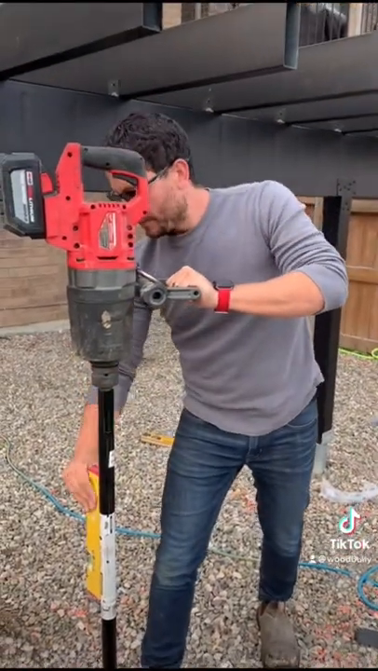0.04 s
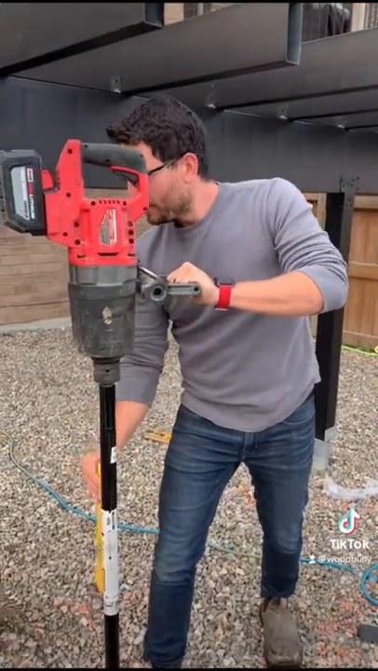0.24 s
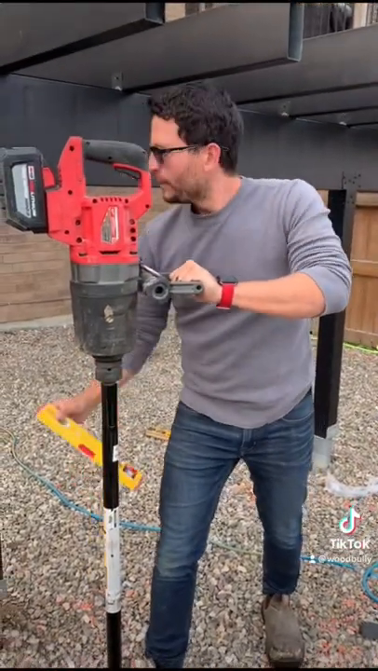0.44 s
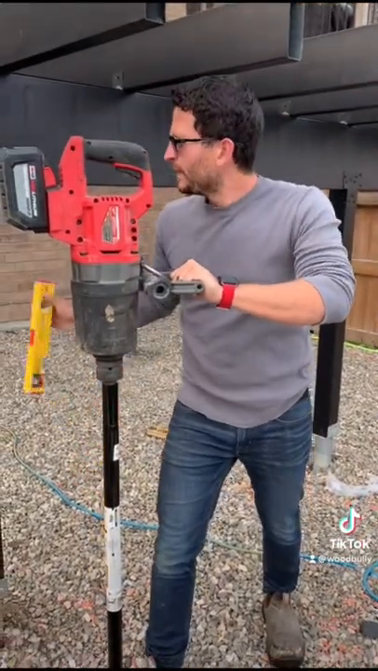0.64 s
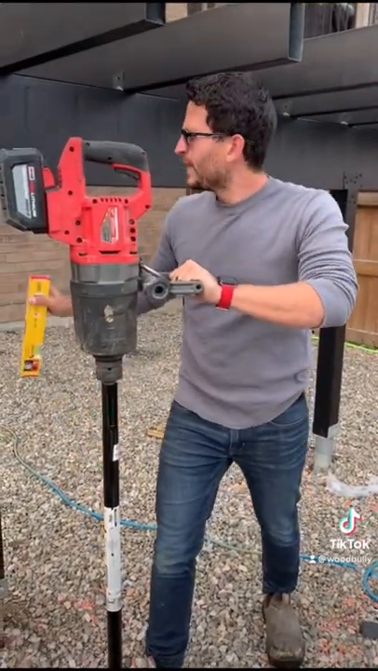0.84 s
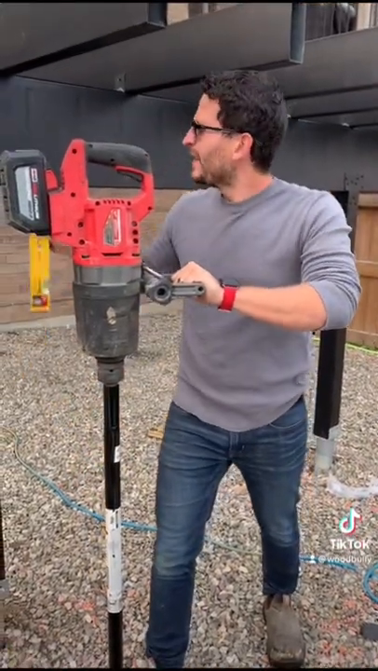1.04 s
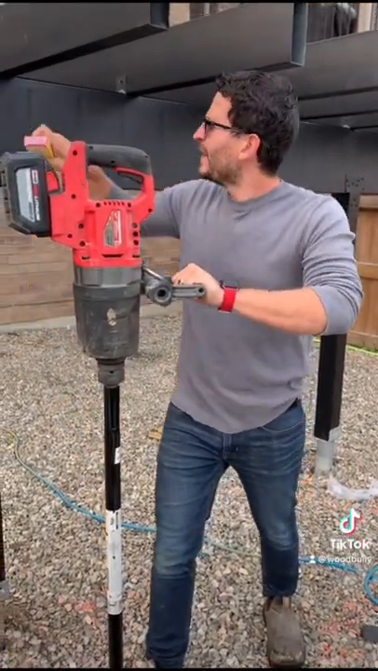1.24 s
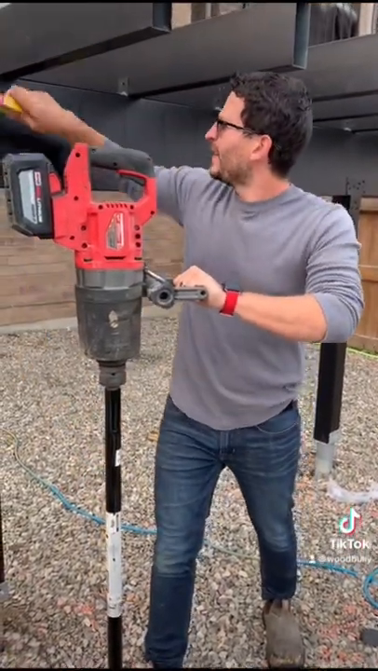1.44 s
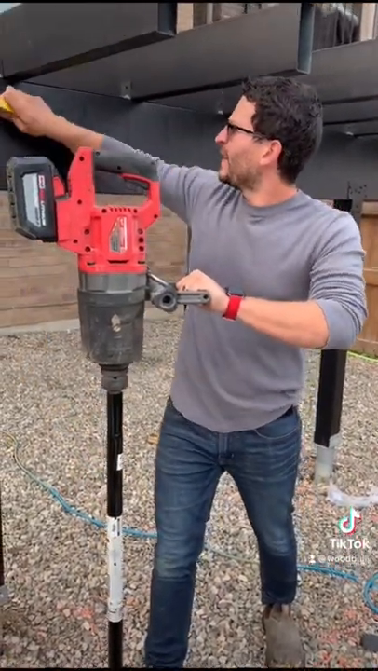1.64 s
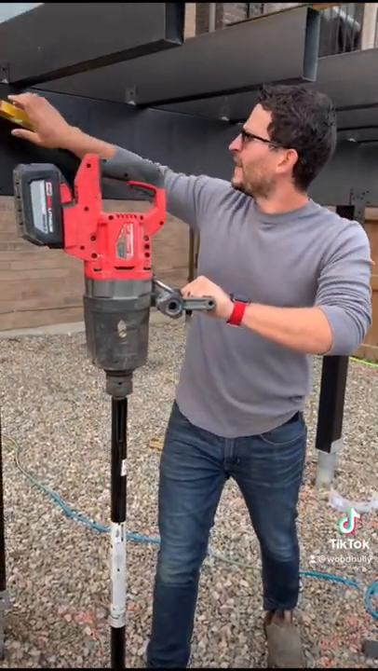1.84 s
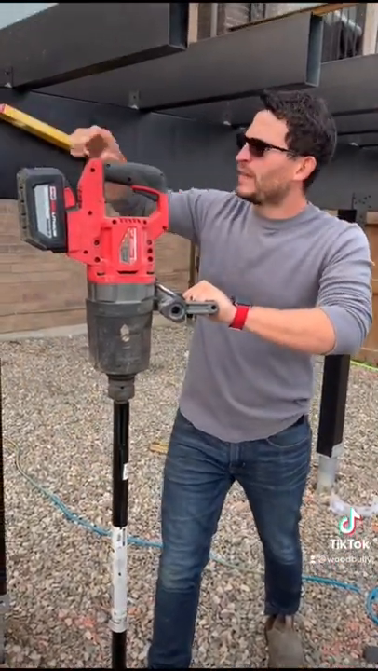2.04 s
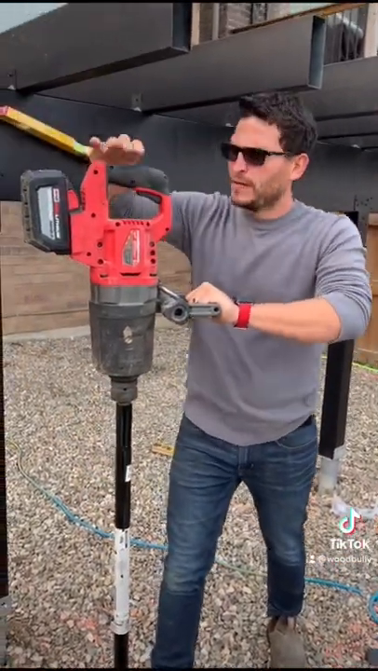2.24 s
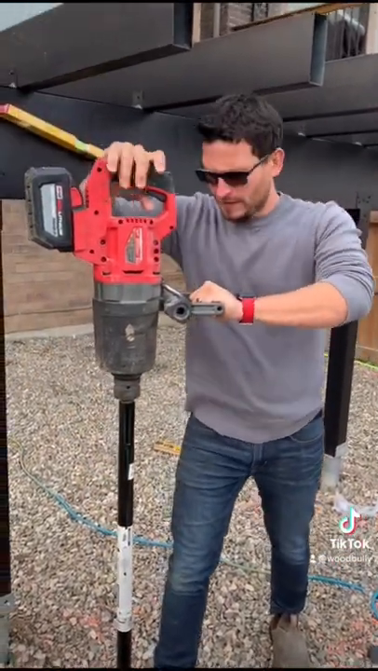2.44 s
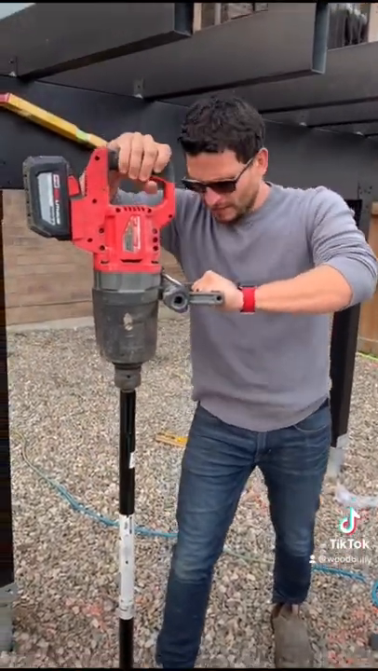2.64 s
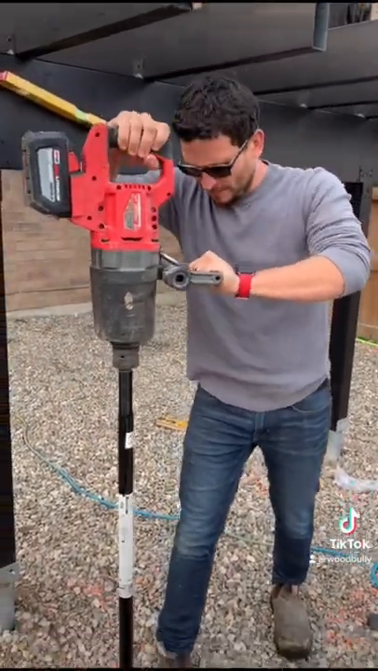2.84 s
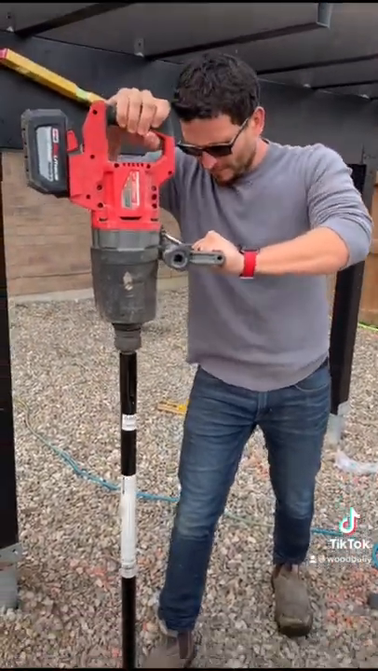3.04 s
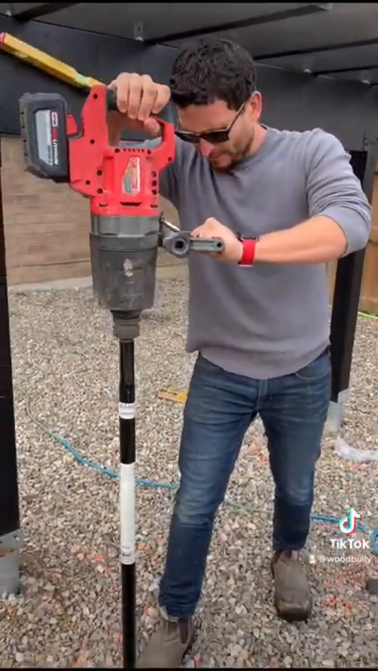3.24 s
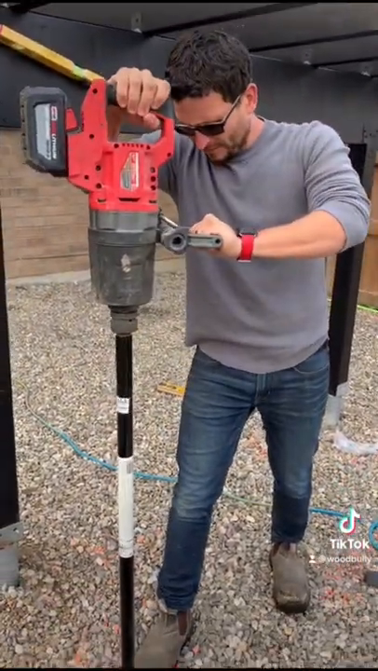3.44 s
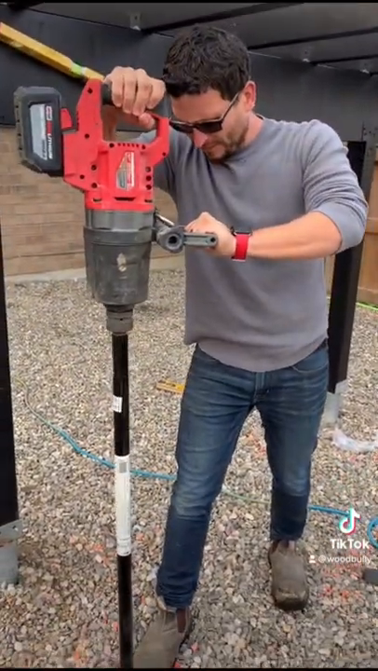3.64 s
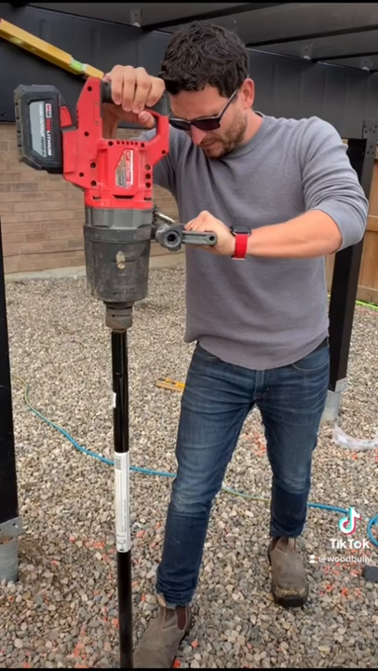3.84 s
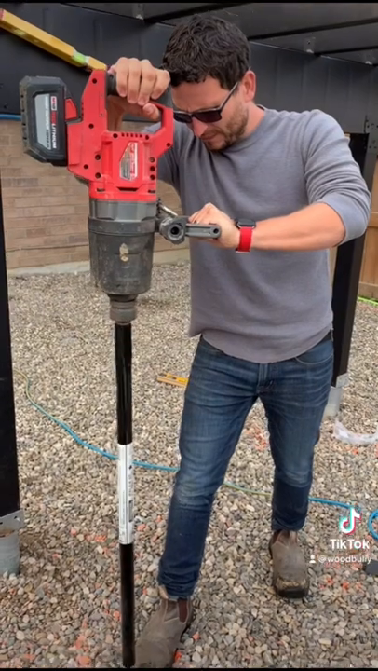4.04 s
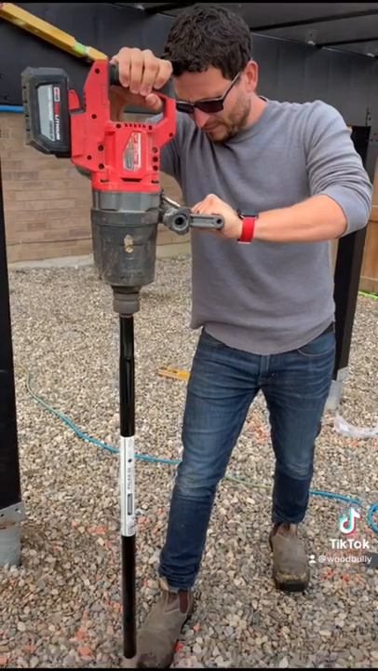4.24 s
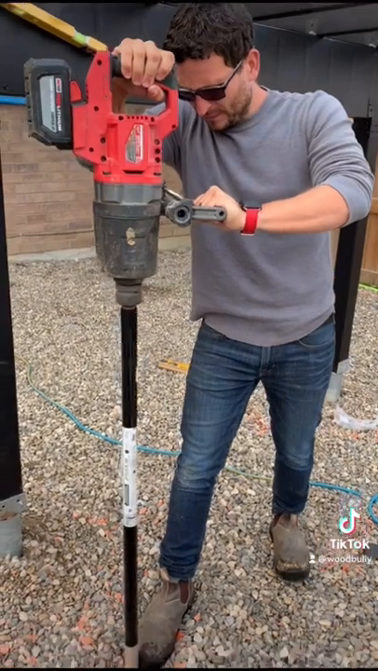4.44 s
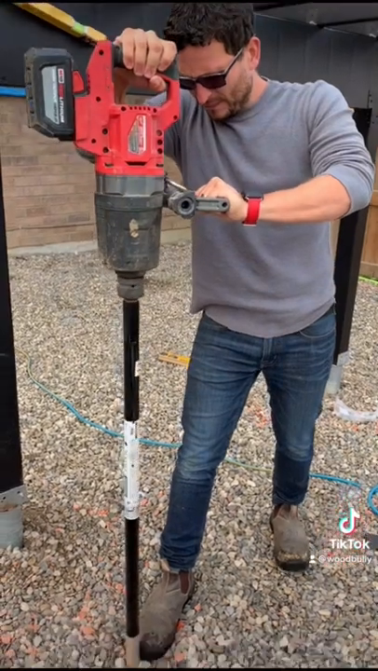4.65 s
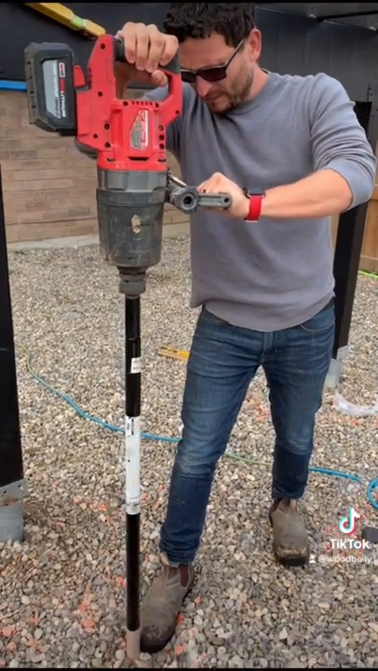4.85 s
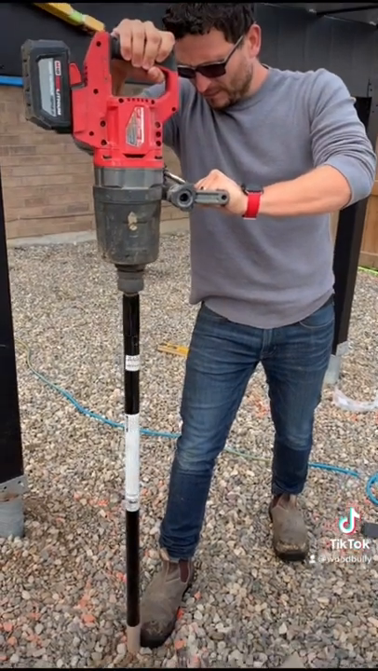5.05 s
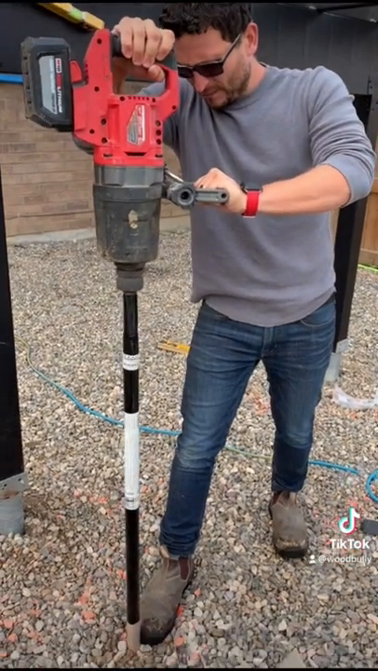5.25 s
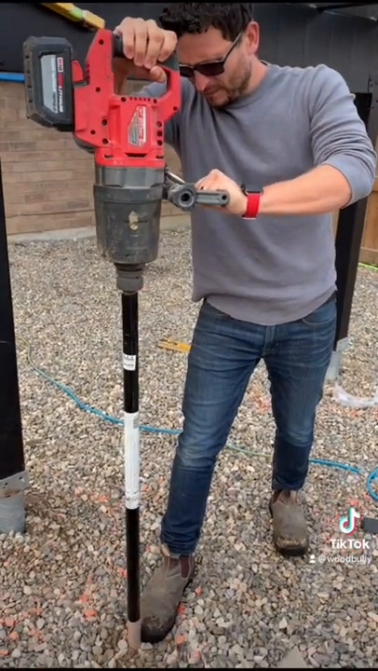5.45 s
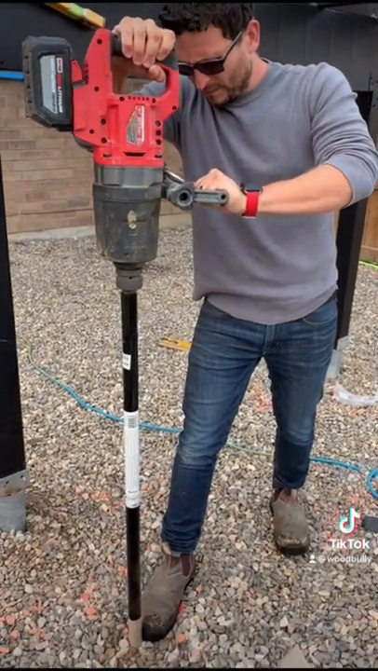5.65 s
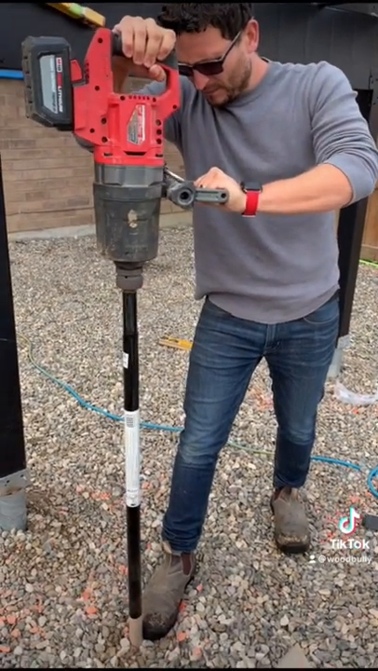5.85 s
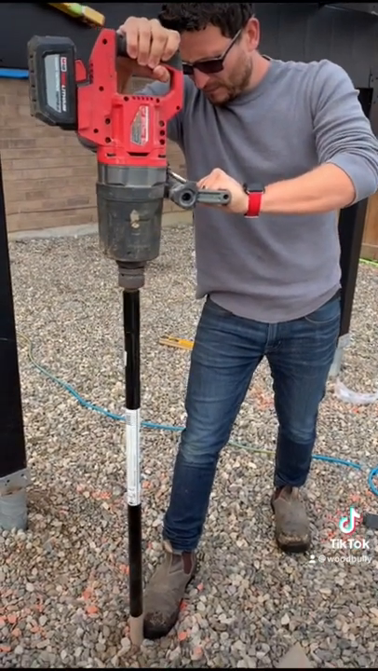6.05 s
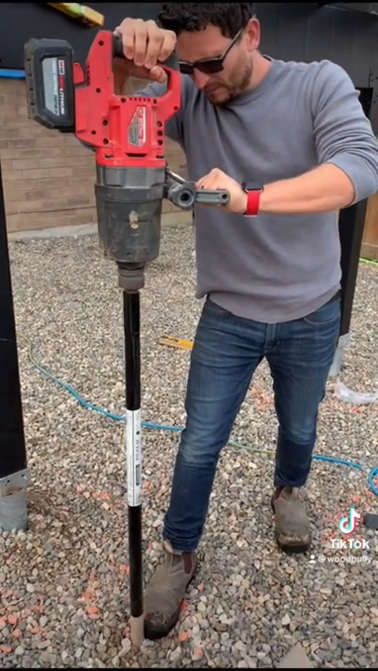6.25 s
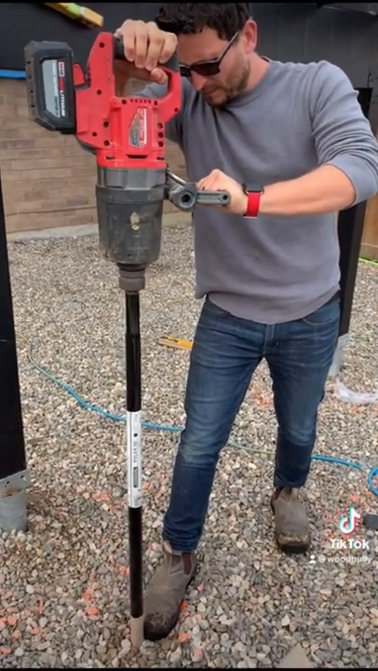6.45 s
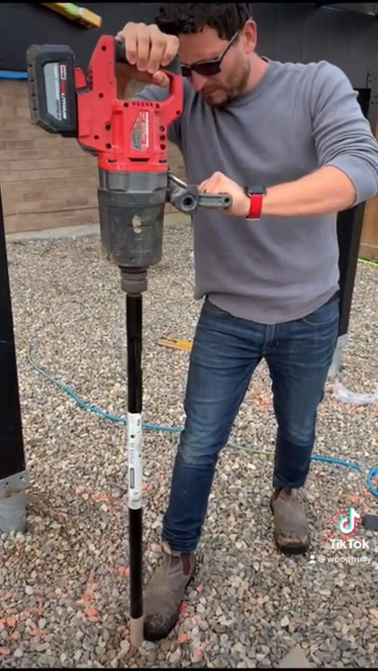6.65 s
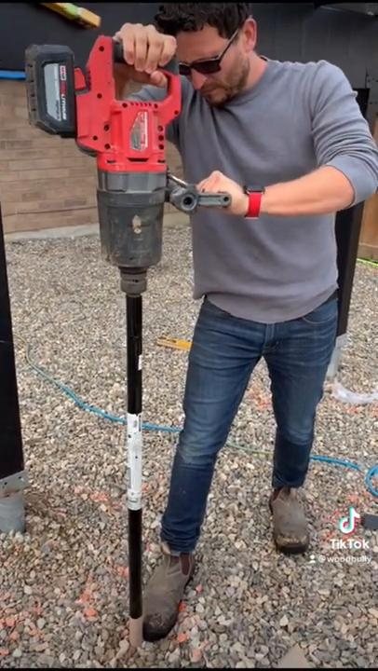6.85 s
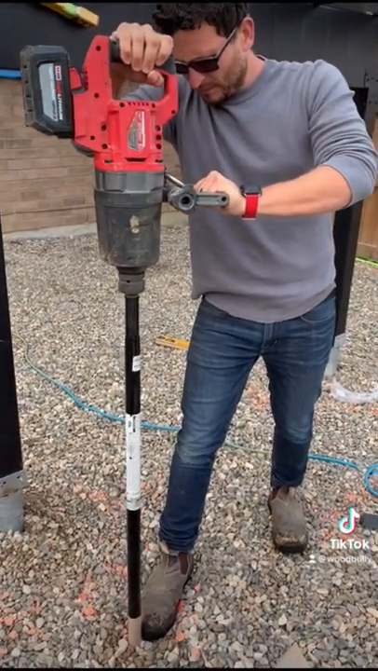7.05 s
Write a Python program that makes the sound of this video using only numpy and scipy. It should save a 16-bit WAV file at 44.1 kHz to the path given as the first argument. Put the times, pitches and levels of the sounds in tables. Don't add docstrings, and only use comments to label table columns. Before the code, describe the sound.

Outdoors in a gravel yard under a steel deck, faint traffic rumble and air with tiny gritty ticks. A level is laid on a steel beam: a sharp bending clang with a long beating ring. Then a motor rattles and whirs up, and rapid, loud, clattering steel blows drive a pile without pause, each with hard rebounds. Close phone microphone, wide stereo, short metallic echoes.

```python
import sys
import numpy as np
from scipy import signal
from scipy.fft import rfft, irfft, next_fast_len
from scipy.io import wavfile
from scipy.ndimage import uniform_filter1d, minimum_filter1d

SR = 44100
rng = np.random.default_rng(int(sys.argv[2]) if len(sys.argv) > 2 else 0)


def output_pcm(signal):
    pcm = np.clip(np.atleast_2d(signal).T, -1, 1) * 32767
    wavfile.write(sys.argv[1], SR, np.round(pcm).astype(np.int16))


def invert_db(x):
    u = np.asarray(x, float) / 20
    return 10 ** u


N = 313282
TIME_S = np.arange(N) / SR


def evened(x):
    return x / np.sqrt(np.mean(x ** 2) + 1e-20)


def read(points, hz, col=1):
    return np.interp(np.log(hz + 1), np.log([p[0] + 1 for p in points]), [p[col] for p in points])


def curve(rows, col):
    return np.interp(TIME_S, [r[0] for r in rows], [r[col] for r in rows])


def add(mix, s, sound):
    part = mix[round(s * SR):][:len(sound)]
    part += sound[:len(part)]


def resonate(x, hz, width_hz):
    r = np.exp(-np.pi * width_hz / SR)
    return signal.lfilter([1 - r, 0, r - 1], [1, -2 * r * np.cos(2 * np.pi * hz / SR), r * r], x)


def bands(centres_hz, size):
    padded = next_fast_len(size)
    log_hz = np.log(np.fft.rfftfreq(padded, 1 / SR) + 1)
    z = rfft(rng.standard_normal(size), padded)
    at = np.log(np.r_[centres_hz[0] * .6, centres_hz, centres_hz[-1] * 1.08])
    return [irfft(z * np.interp(log_hz, at, w), padded)[:size] for w in np.eye(len(at))[1:-1]]


def coloured(points, size):
    padded = next_fast_len(size)
    gain = invert_db(read(points, np.fft.rfftfreq(padded, 1 / SR)))
    return evened(irfft(rfft(rng.standard_normal(size), padded) * gain)[:size])


# time in seconds, level in dB.
RUMBLE_LEVEL = [
    (0.0, -47.5),
    (0.92, -47),
    (1.28, -43.5),
    (1.48, -43.5),
]
# frequency in Hz, density in dB per Hz.
RUMBLE = [(15, -61.5), (25, -37), (43, -18), (62, -3), (81, -10), (97, -7), (161, -8.5), (249, -36),
          (305, -28), (600, -50.5), (780, -84.5), (1320, -120)]
# frequency in Hz, density in dB per Hz.
AIR = [(250, 5.5), (600, -2.5), (1500, -5), (2200, -17), (2900, -12.5), (3600, -20), (4700, -17),
       (5500, -18.5), (6600, -19.5), (7500, -29.5), (9000, -32.5), (15000, -27.5)]
# frequency in Hz, likeness 0 to 1.
AIR_LIKENESS = [(100, 0.99), (300, 0.66), (650, 0.13), (1400, 0.16), (2600, .6), (4500, 0.76), (15000, 1)]


def yard(air_db=-62.5, gust_db=6.5, gust_s=.12, waver_db=1.5):
    size = next_fast_len(N)
    air = invert_db(air_db + gust_db * np.exp(-TIME_S / gust_s))
    air = air * invert_db(waver_db * evened(uniform_filter1d(rng.standard_normal(N), size=3000)))
    same = np.clip(read(AIR_LIKENESS, np.fft.rfftfreq(size, 1 / SR)), 0, 1)
    rumble = invert_db(curve(RUMBLE_LEVEL, 1))
    a, b = (rumble * coloured(RUMBLE, N) + air * coloured(AIR, N) for _ in "ab")
    right = irfft(same * rfft(a, size) + np.sqrt(1 - same ** 2) * rfft(b, size), size)[:N]
    return np.array([a, right])


# start in seconds, peak in dB,
# centre in Hz, t60 in seconds, treble in dB.
TICKS = [(0.3344, -51, 2790, 0.025, -8), (0.4886, -33.5, 3400, 0.023, -8), (0.5107, -48, 2300, 0.03, -7),
         (0.7137, -39.5, 6000, 0.031, -12), (0.7267, -41, 5540, 0.033, -19), (0.745, -52, 3500, 0.066, -14),
         (1.2144, -77, 2660, 0.027, -29), (2.2894, -47.5, 2340, 0.028, -33),
         (2.4064, -55, 2440, 0.025, -28), (2.481, -48, 2800, 0.04, -33), (2.4887, -39.5, 2300, 0.033, -43),
         (2.659, -48, 5500, 0.03, -19), (2.7082, -23, 2050, 0.052, -44)]


def ticks():
    t, out = np.arange(3000) / SR, np.zeros(N)
    for s, db, hz, t60_s, treble_db in TICKS:
        spectrum = [(hz / 5, -20), (hz / 1.4, -4), (hz, 0), (9000, treble_db + 1), (16000, treble_db - 18)]
        burst = coloured(spectrum, len(t))
        shape = invert_db(db - 8.5 - 60 * t / max(t60_s, .005)) * np.minimum(t / 0.00028, 1)
        add(out, s, shape * burst)
    return out


# frequency in Hz, level in dB, t60 in seconds.
BEAM = [(169.7, -4.5, 2.3), (310, -17.5, 3), (467, -11, 1.2), (581, -11, 3.6), (724, -28, 1.4),
        (826, -21, 1.2), (846, -13.5, 4.3), (970, -12.5, 2.2), (1180, -16.5, 0.78), (1650, -14.5, 2.86)]
# centre in Hz, early dB, early t60 in seconds, late dB, late t60 in seconds.
FRAME = [(75, -51, 0.64, -50, 15), (170, -38, 1, -35, 5.9), (277, -56, 0.48, -37, 5.3),
         (479, -44.5, 0.27, -30, 3.7), (660, -26, 0.39, -40, 3.2), (968, -34.5, 0.28, -34.5, 2.53),
         (1560, -15.5, 0.12, -36, 1.8), (2950, -22.5, 0.37, -56, 3.45), (5500, -22.5, 0.21, -48.5, 0.75),
         (10300, -18, 0.064, -46, 0.3), (14500, -47.5, 0.083, -51, .3)]


def clang(start_s=1.5285, sweep_db=-6, modes_db=-23.5, top_hz=2700, low_hz=119, glide_ms=1.1):
    t, out = np.arange(60000) / SR, np.zeros(N)
    hz = low_hz + top_hz / (1 + (t * 1e3 / glide_ms) ** 1.9)
    sweep = invert_db(sweep_db) * np.sin(2 * np.pi * np.cumsum(hz) / SR) / (1 + (t / .0155) ** 10)
    twins = rng.uniform(-9.5, 9.35, (len(BEAM), 3, 1))
    modes = 0
    for (f, db, t60_s), p in zip(BEAM, twins):
        tones = np.sin(2 * np.pi * (f + p * min(f / 600, 1)) * t + p).sum(0)
        modes = modes + invert_db(modes_db + db - 60 * t / min(t60_s, 1.7)) * tones
    frame = 0
    for noise, row in zip(bands([r[0] for r in FRAME], len(t)), FRAME):
        _, early_db, early_s, late_db, late_s = row
        fall = invert_db(early_db - 60 * t / early_s) + invert_db(late_db - 60 * t / late_s)
        frame = frame + evened(noise) * fall
    add(out, start_s, sweep + (modes + frame) * np.minimum(t / 0.00071, 1))
    slide = np.arange(600)
    add(out, start_s - 600 / SR, invert_db(-16 - 38 * (1 - slide / 600)) * coloured(HISS, 600))
    return out


# frequency in Hz, level in dB, t60 in ms, delay after the rebound in ms.
THUMP = [(63.9, -32, 200, -18.5), (81.4, -36.5, 176, 12), (104, -37, 263, 11.5), (163.7, -30.5, 94, 8),
         (213.4, -37, 214, 8), (259.5, -37.5, 93, 25.5), (115, -16, 15, -8)]


def thump(first_db=6, settle_s=0.31, take_up_s=2.772):
    t, out = np.arange(9000) / SR, np.zeros(N)
    rebounds = np.array(TURNS)[:, 0] + 0.0156
    for hz, db, t60_ms, after_ms in THUMP:
        push = invert_db(db - 60e3 * t / t60_ms) * np.sin(2 * np.pi * hz * t) * np.minimum(t * hz * 2, 1)
        for s in np.r_[take_up_s, rebounds]:
            add(out, s + after_ms / 1e3, invert_db(first_db * np.exp((rebounds[0] - s) / settle_s)) * push)
    return out


# frequency in Hz, width in Hz, level in dB.
GEARS = [(674, 224, -4.5), (1446, 110, -1.5), (1860, 480, 1), (2252, 320, -1.5), (3110, 240, -10)]
# frequency in Hz, width in Hz, level in dB.
WHINE = [(7090, 44, 2), (7720, 35, -2.5), (8310, 32, 2)]
# frequency in Hz, level in dB.
HISS = [(300, -23), (1000, 4), (3500, -5.5), (6000, -10.5), (9000, -13.5), (12000, -26), (15000, -35.5)]
# time in seconds, level in dB.
DRIVE = [
    (2.697, -53),
    (2.703, -43),
    (2.72, -26),
    (2.727, -32),
    (2.755, -24),
    (2.788, -22),
    (2.84, -33),
    (3.3, -33.5),
    (3.45, -36),
]
# time in seconds, tilt in dB per octave.
TILT = [
    (2.73, 4),
    (2.762, -10),
    (2.785, -5.5),
    (2.792, 11),
    (2.84, -0.5),
]
# time in seconds, level in dB.
SLACK = [(2.7263, 9), (2.7317, 10), (2.74, 8), (2.7462, 8), (2.7503, 9), (2.7548, 10), (2.762, -1),
         (2.7658, 1), (2.77, 5), (2.7738, 8), (2.7785, 1), (2.7835, 2)]


def motor(teeth_per_s=900, lumpy_db=1.5, start_hz=8100, whine_db=-47.5, whine_rise_s=.02, spin_s=.085,
          fan_db=-29.5, fan_power=2.7, fan_load_db=-9, load_s=0.74):
    white = rng.standard_normal(N)
    loaded = np.clip((TIME_S - TURNS[0][0] + 0.03) * 40, 0, 1)

    teeth = (rng.random(N) < teeth_per_s / SR) * rng.standard_normal(N)
    slack, (at_s, db) = np.zeros(N), np.transpose(SLACK)
    slack[(at_s * SR).astype(int)] = invert_db(db)
    teeth = (0.4 + .7 * loaded) * teeth * invert_db(lumpy_db * rng.standard_normal(N)) + slack
    teeth = signal.oaconvolve(teeth, np.hanning(15), "same")
    tilt = curve(TILT, 1)
    gears = []
    for hz, width_hz, db in GEARS:
        mode = evened(resonate(resonate(teeth, hz, width_hz), hz, 2 * width_hz))
        gears.append(invert_db(db + tilt * np.log2(hz / 1800)) * mode)
    rattle = (loaded * gears[0] + sum(gears[1:])) / 1.74

    running = sum(invert_db(db) * evened(resonate(white, hz, width_hz)) for hz, width_hz, db in WHINE)
    starting = evened(resonate(resonate(white, start_hz, 160), start_hz, 400))
    whine = loaded * running + (1 - loaded) * starting

    since_s = np.maximum(TIME_S - DRIVE[0][0], 0)
    speed = np.minimum(since_s / spin_s, 1)
    fan = invert_db(fan_db + fan_load_db * np.minimum(since_s / load_s, 1)) * speed ** fan_power * coloured(HISS, N)
    rattle = (since_s > 0) * invert_db(curve(DRIVE, 1)) * rattle
    return rattle + invert_db(whine_db) * np.minimum(since_s / whine_rise_s, 1) * whine + fan


# frequency in Hz, level in dB.
CATCH = [(700, -26), (1090, -30), (1850, -38)]


def catch(after_ms=63, length_ms=5.5, uneven_db=0.0, loose_ms=0.58):
    t, out = np.arange(0, length_ms / 1e3, 1 / SR), np.zeros(N)
    for (s, *_), luck in zip(TURNS, rng.standard_normal((len(TURNS), 1 + len(CATCH)))):
        tap = 0
        for (hz, db), u in zip(CATCH, luck[1:]):
            tap = tap + invert_db(db + uneven_db * u) * np.sin(2 * np.pi * hz * (1 + 0.018 * u) * t)
        add(out, s + (after_ms + loose_ms * luck[0]) / 1e3, tap * np.hanning(len(t)))
    return out


# strike time in seconds, strike and rebound in dB over the steady blow.
TURNS = [(2.7912, 8, -1.5), (2.8656, 3.5, 1), (2.9428, 4.5, 2.5), (3.0211, 3, 1.0), (3.0989, 1.5, 3.5),
         (3.1757, 4, 1.5), (3.2531, 5.5, 0), (3.329, 1, -0.5), (3.406, 0, -2), (3.4816, 0.5, 1),
         (3.5599, -1.5, -2), (3.6364, 0.5, -2.5), (3.7141, 0, -4), (3.7893, -2.5, 0.5), (3.866, -1, -5.5),
         (3.9422, 1, -3), (4.0175, -0.5, -3.5), (4.094, -1.5, -1), (4.1709, 0.5, -0.5), (4.2472, 0, -3),
         (4.3242, 0, -3), (4.401, -1.5, 0.5), (4.4791, -0.0, -0.5), (4.5558, 0, -2), (4.6335, 0.5, -0.5),
         (4.7113, -1.0, -1.5), (4.7873, 1, -3.5), (4.8628, -0.5, -3), (4.9377, -1.5, -1),
         (5.0142, -0.5, 0.5), (5.0908, -1.5, -3), (5.168, 1.5, -0.5), (5.2441, 0.5, -2.5),
         (5.3199, -0.5, 0), (5.3975, -2, -2), (5.4736, 0, 1.0), (5.5503, 0.5, -4), (5.6255, 0.5, 0),
         (5.7011, 0, -0.5), (5.7756, -0.0, -1), (5.851, 0, -2), (5.9268, -0.0, 0), (6, 0, -1),
         (6.0753, 1, -2), (6.1515, 0, -3), (6.2265, -0.5, -2), (6.3024, 2, -2.5), (6.377, 1.5, -2.5),
         (6.4529, 1, -1.0), (6.5279, 0.5, -2), (6.6039, 0, -0.5), (6.6797, -1, -2.5), (6.7561, 0.5, -0.5),
         (6.8326, -1.0, -3), (6.909, -0.0, 0.5), (6.9845, -1, -1.5), (7.0613, 1.0, -3)]
# delay after the strike in ms, level in dB over the steady blow.
KNOCKS = [(34.0, 2.5), (34.0, -4), (33.4, 3.75), (36.2, 0), (37.6, 5.5), (33.9, 8), (34.3, -35), (35.3, -8),
          (36.6, -2), (35.7, 0.5), (35, 4), (36.6, 1.5), (34.6, 3.5), (35.4, -2), (34.9, 5), (35.5, 0),
          (34.6, 1.5), (34.6, 4), (35.1, -2), (35.3, 6), (37.8, 7.5), (36.5, -3), (33.4, 3.5), (35.4, 3),
          (35.8, 1), (35.4, 0), (35.3, 3), (33.8, -5), (33.6, -0.75), (35.8, -2), (35.4, -0.75), (35.6, -3),
          (34.0, -2), (33.7, -3), (35.6, -3), (35.5, -0.0), (36.2, 3.5), (35, 2.5), (36, -11), (35, 3),
          (35.7, 2.5), (36.5, 0.75), (37, -14), (36.7, 4), (35.4, 2), (36.8, 2), (35.4, 4.5), (39, 5),
          (36.4, 6.5), (34.6, 0.5), (37.4, -1), (35.6, -0.75), (37, 3), (37, 2), (35.9, 1), (36.3, 2),
          (33.8, 8)]


def hits(strike_db=-13.5, rebound_db=-11.5, knock_db=-22, rebound_ms=16.4, loose_ms=.15):
    s, strike_over, rebound_over = np.transpose(TURNS)
    knock_ms, knock_over = np.transpose(KNOCKS)
    early_ms = loose_ms * np.clip(rng.standard_normal(len(s)), -2, 2) - .3
    kind = np.repeat([0, 1, 2], len(s))
    at_s = np.r_[s + early_ms / 1e3, s + rebound_ms / 1e3, s + knock_ms / 1e3]
    return at_s, kind, np.r_[strike_db + strike_over, rebound_db + rebound_over, knock_db + knock_over]


# frequency in Hz, strike, rebound and knock in dB, t60 in ms.
STEEL = [(552, 0.5, -5, -7, 54.7), (788, 3.5, -12, -2.5, 22.5), (1010, 11, 8, 12, 11.8),
         (1182, 1, -1.5, -28, 36.5), (1297, -24, 13.5, 4, 14.6), (1394, 2.5, 2.5, -12, 20.7),
         (1365, -3.5, -1, 10.5, 15), (1752, -1, -41, -40, 31), (1950, -31, 0, -8, 35.6),
         (2665, -13, -4.5, -27, 46), (3190, -18.5, -8.5, -24, 76), (3758, 12, 10, -15, 16.4),
         (5480, -12, -4.5, -18, 60), (8000, -1, -34, -16, 20)]


def ring(s, kind, db, level_db=-4, spread=0.035, uneven_db=1.0, loose_rad=0.84, rise_ms=2.01):
    modes, t, out = np.array(STEEL), np.arange(1800) / SR, np.zeros(N)
    luck = rng.standard_normal((len(s), 3, len(STEEL), 1))
    rise = 1 - np.exp(-t * 1e3 / rise_ms)
    for s0, k, d, (tune, size, phase) in zip(s, kind, db, luck):
        fall = invert_db(modes[:, [1 + k]] + uneven_db * size - 66100.0 * t / modes[:, [4]])
        tones = fall * np.sin(2 * np.pi * modes[:, [0]] * (1 + spread * tune) * t + loose_rad * phase)
        add(out, s0, invert_db(d) * tones.sum(0) * rise)
    return invert_db(level_db) * out


# centre in Hz, strike, rebound and knock in dB, t60 in ms.
CLATTER = [(358, -10.5, -10, -11, 28), (640, -2.5, -2, -2, 54), (1140, 1, 0, 0, 40),
           (2300, -3, -5, -11, 28.7), (3820, -4.5, -5.5, -7, 38), (5850, 3.5, 9.5, -20, 6.6),
           (5870, -7, -6, -13, 41.5), (8100, -6, -4, -5.5, 18.8), (11770, -13, -7.5, -32, 19),
           (12850, -16, -14, -29, 26), (15000, -21, -18, -31, 18)]


def clatter(s, kind, db, level_db=8, colour_db=1.13, chatter_db=4.5, crack_db=(0, 8), crack_share=0.03,
            rise_ms=(1.9, .3)):
    at = np.minimum((s * SR).astype(int) - 14, N - 1)
    luck, out = rng.standard_normal((len(s), len(CLATTER))), np.zeros(N)
    chatter = np.clip(evened(uniform_filter1d(rng.standard_normal(N), size=40)), -2, 1.5)
    bounce = rng.random((len(s), 2))
    again = np.minimum(at + (SR * (0.0039 + 0.0088 * bounce[:, 0])).astype(int), N - 1)
    late = np.minimum(kind, 1)
    slow, fast = np.exp(-1e3 / (np.array(rise_ms) * SR))
    for k, noise in enumerate(bands([r[0] for r in CLATTER], N)):
        hz, *kind_db, t60_ms = CLATTER[k]
        train, treble = np.zeros((2, N)), min(hz / 6000, 1)
        train[late, at] = invert_db(db + np.array(kind_db)[kind] + colour_db * luck[:, k])
        train[1, again] += train[late, at] * invert_db(-11 - 20 * bounce[:, 1])
        strike = signal.lfilter([1 - slow], [1, -slow], train[0])
        sudden = signal.lfilter([1 - fast], [1, -fast], train[1])
        blow = np.array([strike, sudden])
        fall, quick = invert_db(-60e3 / (t60_ms * SR * np.array([1, crack_share])))
        tail = signal.lfilter([1], [1, -fall], blow.sum(0))
        crack = signal.lfilter([1], [1, -quick], invert_db(np.array(crack_db)) @ blow)
        out += noise * (tail + treble * crack) * invert_db(chatter_db * np.sqrt(treble) * chatter)
    return invert_db(level_db) * out


# delay in ms, left and right level in dB.
SLAPS = [
    (4.7, -13, -18.5),
    (10, -10.5, -16),
    (14.5, -25.5, -17),
]


def slaps(x, apart_samples=9):
    taps = np.zeros((2, 1200))
    for ms, left_db, right_db in SLAPS:
        at = round(ms * SR / 1e3) + np.array([0, apart_samples])
        taps[[0, 1], at] = invert_db(left_db), invert_db(right_db)
    return signal.oaconvolve(x[None], taps, axes=1)[:, :N]


def near(x, level_db=-8, t60_s=.03, band_hz=(800, 3500)):
    t = np.arange(900) / SR
    taps = rng.standard_normal(len(t)) * invert_db(-60 * t / t60_s)
    taps = signal.lfilter(*signal.butter(3, band_hz, "band", fs=SR), taps / np.linalg.norm(taps))
    return invert_db(level_db) * signal.oaconvolve(x, taps)[:N] * np.array([[1], [-1]])


# frequency in Hz, t60 in seconds.
DECK = [(100, 1), (500, 0.42), (1500, 0.12), (4000, 0.29), (9000, 0.15), (16000, 0.37)]


def deck(x):
    taps = np.zeros((2, SR // 2))
    at = np.arange(200, SR // 2 - 20, 20) + rng.integers(0, 20, (2, (SR // 2 - 201) // 20))
    np.put_along_axis(taps, at, rng.choice([-1., 1.], at.shape), 1)
    hz, t, z = signal.stft(taps, SR, nperseg=256)
    same = np.interp(hz, [200, 900, 3300, 4400], [.9, .3, .4, .93])[:, None]
    z = np.array([z[0], same * z[0] + np.sqrt(1 - same ** 2) * z[1]])
    tail = signal.istft(z * invert_db(-60 * t / read(DECK, hz)[:, None]), SR, nperseg=256)[1]
    return signal.fftconvolve(x[None], tail / np.linalg.norm(tail[0]), axes=1)[:, :N]


def scene():
    contacts = hits()
    tool = clatter(*contacts) + ring(*contacts)
    beam = clang()
    slapped = slaps(tool)
    tool = tool + catch() + motor()
    duck = invert_db(np.interp(TIME_S, [2.75, 2.9], [0, -6]))
    echoes = deck(invert_db(-10.0) * tool + invert_db(-13.5) * beam)
    return tool + slapped + beam + ticks() + thump() + near(tool + beam) + echoes + duck * yard()


def thin_treble(x, faint_db=25, top_hz=12200, edge_hz=15900, edge_db=-20):
    hz, _, z = signal.stft(np.array([x[0] + x[1], x[0] - x[1]]) / 2, SR, nperseg=1024)
    row_hz = hz[:, None]
    power = uniform_filter1d(abs(z) ** 2, size=21, axis=1)
    loud = power[:, hz > 800].mean((0, 1))
    held = -minimum_filter1d(-loud, size=5, origin=2)
    calm = loud < .85 * held
    rising = loud > 2.5 * np.roll(loud, 1)
    other = power[::-1]
    weak = (power < other / 6) & (row_hz > 4200) & calm
    weak |= (power < other / 3) & (row_hz > 8000) & ~rising
    starved_hz = rng.uniform(8000, 15900, len(loud))
    weak |= (np.roll(loud, -2) > 5 * loud) & ~rising & (row_hz > starved_hz)
    faint = (power < held * invert_db(-2 * faint_db)) & (row_hz > top_hz)
    edge = np.where(row_hz > edge_hz, invert_db(edge_db + 2.5) * rising, 1)
    mid, side = signal.istft(z * ~(weak | faint) * edge, SR, nperseg=1024)[1][:, :N]
    return np.array([mid + side, mid - side])


# frequency in Hz, lag in radians, level in dB over left.
WIDEN = [(0, -.15, .1), (130, -.2, 0), (300, -.4, 1.6), (600, .2, -1.4), (900, .8, -1.2), (1400, -.3, -.4),
         (2100, .4, 3), (2500, 1.25, 2), (2900, 1.35, 0), (3900, 1.7, 0), (4750, 3.14, 0), (8950, 9.42, 0),
         (10300, 11.8, 0), (13300, 15.71, 0), (14600, 18.3, 0), (17600, 19.5, 0)]


def widen(x):
    size = next_fast_len(N + 512)
    hz, (at_hz, late_rad, db) = np.fft.rfftfreq(size, 1 / SR), np.transpose(WIDEN)
    turn = invert_db(np.interp(hz, at_hz, db)) * np.exp(-1j * np.interp(hz, at_hz, late_rad))
    return np.array([x[0], irfft(rfft(x[1], size) * turn, size)[:N]])


def low_pass(x):
    return signal.sosfilt(signal.butter(12, 16990, fs=SR, output="sos"), x)


def record(dry):
    dry = signal.sosfilt(signal.butter(3, 52, "high", fs=SR, output="sos"), dry)
    limited = .92 * np.tanh(widen(dry) / .92)
    edge = signal.firwin(301, 16800, window=("kaiser", 9), fs=SR)
    mix = thin_treble(signal.oaconvolve(limited, edge[None], "same"))
    return low_pass(mix)


dry = scene()
out = record(dry)
output_pcm(out)
```